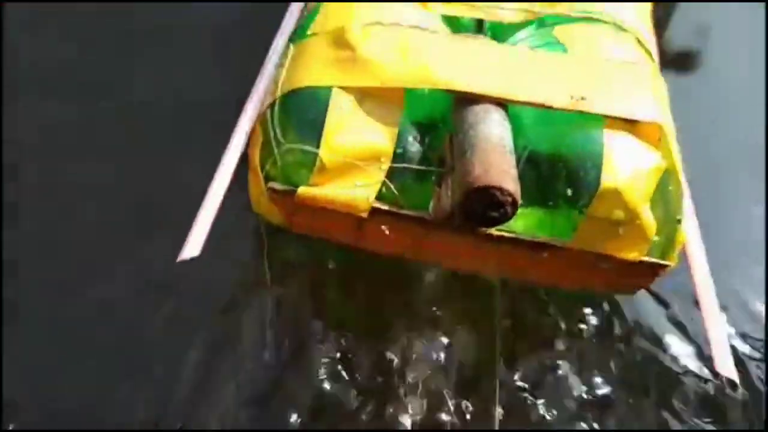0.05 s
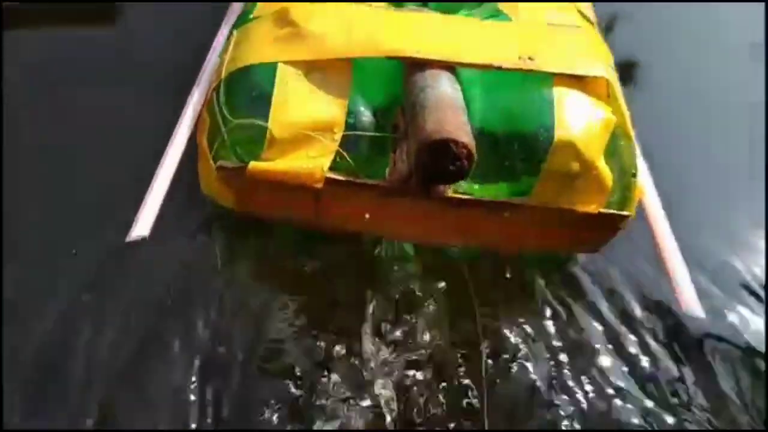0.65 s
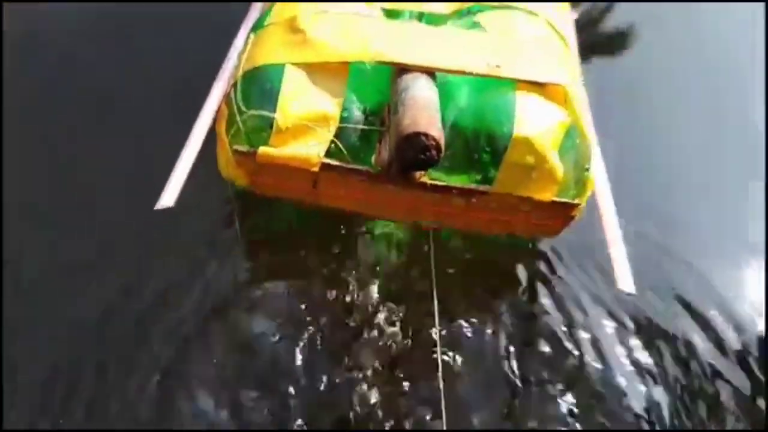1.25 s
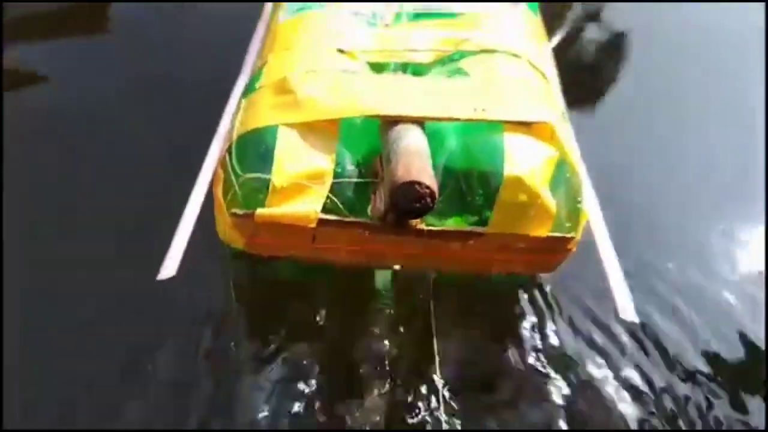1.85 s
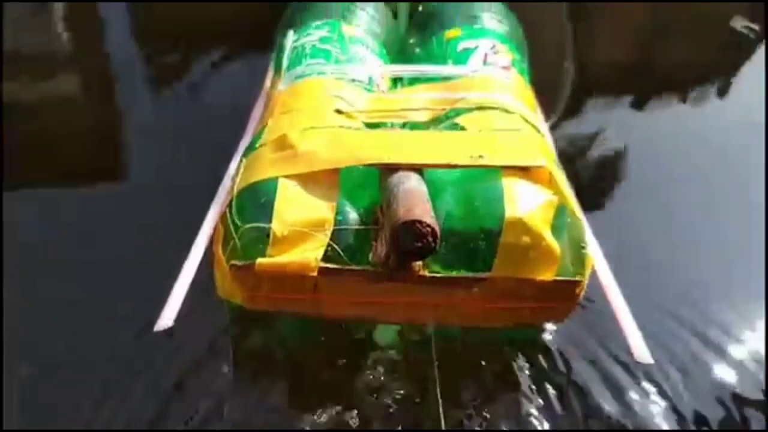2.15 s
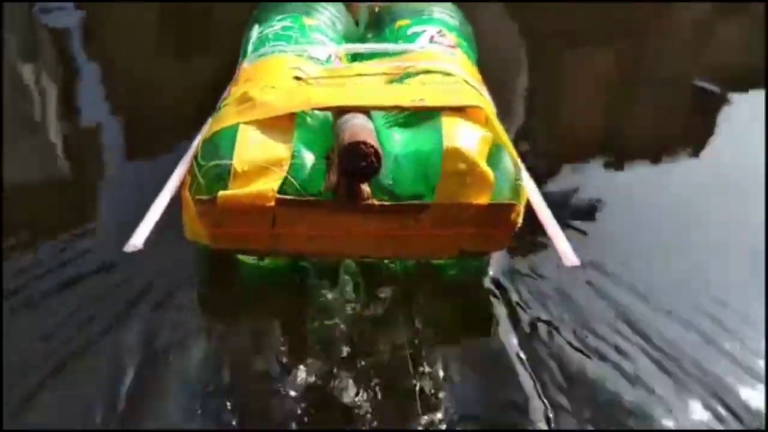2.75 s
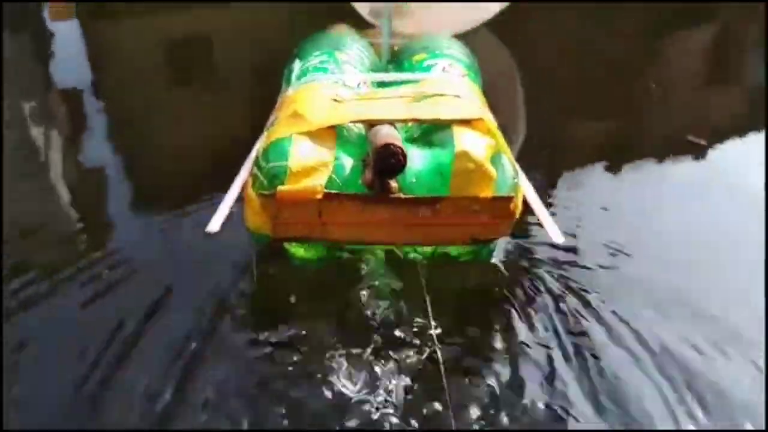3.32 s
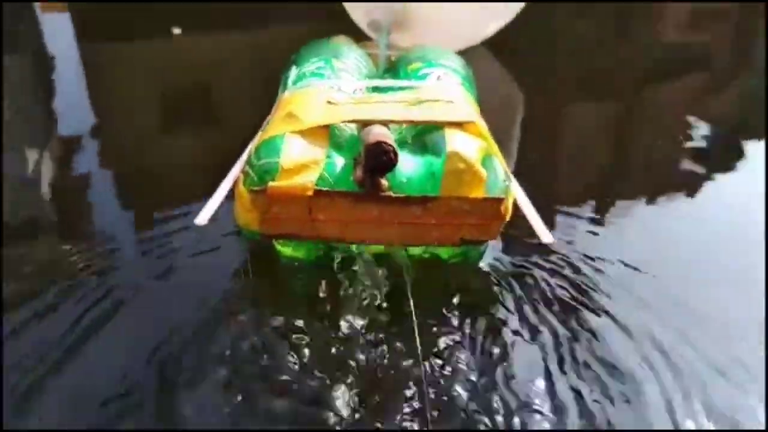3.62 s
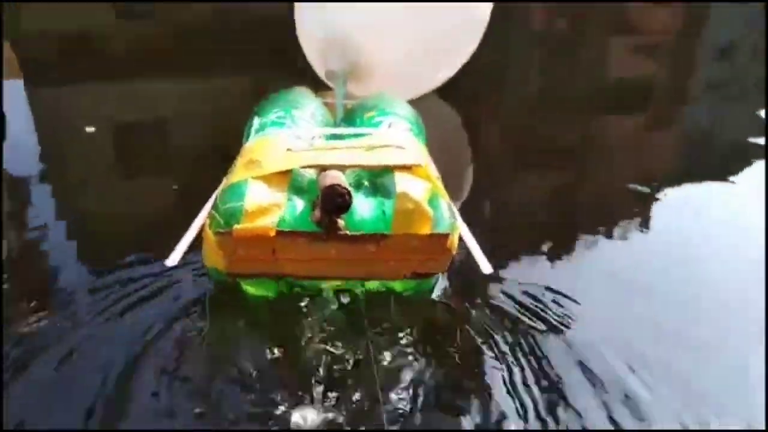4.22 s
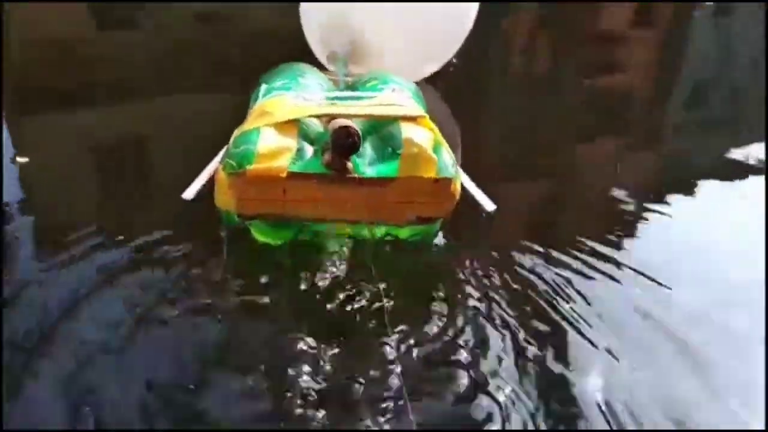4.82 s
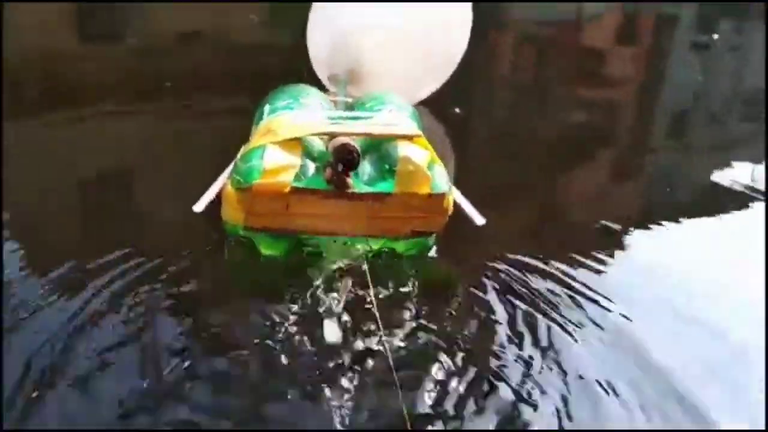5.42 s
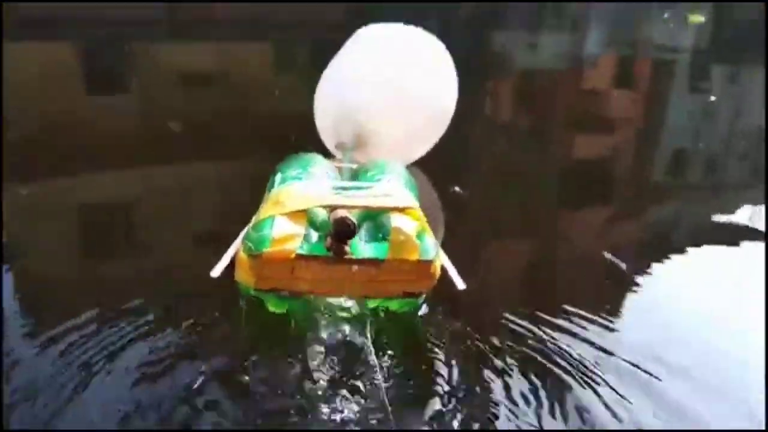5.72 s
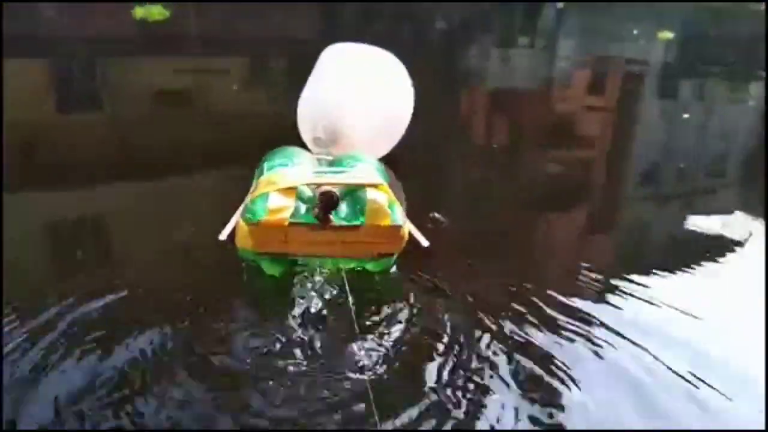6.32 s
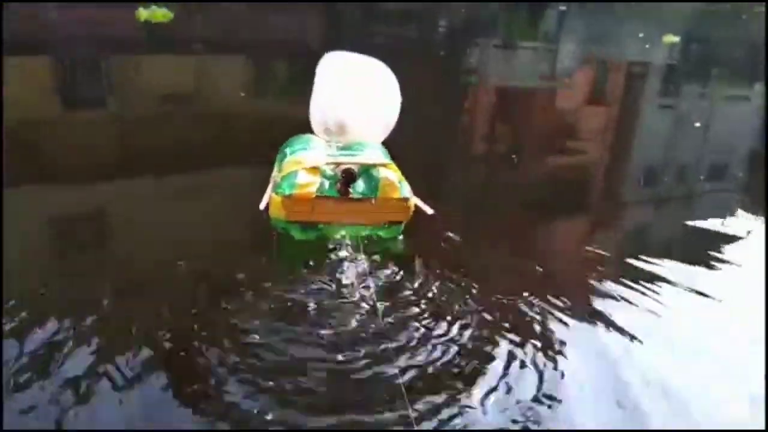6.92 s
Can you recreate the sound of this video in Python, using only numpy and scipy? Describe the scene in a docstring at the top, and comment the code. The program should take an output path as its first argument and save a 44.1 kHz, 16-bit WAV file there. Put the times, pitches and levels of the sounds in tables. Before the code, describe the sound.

A balloon blows air through a straw under a toy boat, and bubbles burst at the pond's surface in short, ringing pops, about nine a second and uneven in rhythm and loudness. Some carry a low glug or a sharp snap. Between them the wake softly gurgles, splashes and fizzes. The sputtering lasts throughout, heard by a close stereo microphone over very faint open air.

```python
"""Air pockets pop behind a toy boat, driven across a pond by a balloon blowing through a straw under its stern.
About nine times a second one bursts at the surface with a short ringing pop; a low glug follows some.
Between the pops the wake gurgles, chirps, splashes and fizzes, over faint echoes and a bed of open air.
A close stereo microphone follows the boat."""
import sys
import numpy as np
from scipy import signal
from scipy.fft import rfft, irfft, next_fast_len
from scipy.io import wavfile
from scipy.ndimage import uniform_filter1d, map_coordinates

SR = 44100
rng = np.random.default_rng(int(sys.argv[2]) if len(sys.argv) > 2 else 0)


def wav_record(signal):
    """Record a signal, one row per channel, as 16-bit PCM in the file named by sys.argv[1]."""
    frames = np.transpose(np.atleast_2d(signal))
    bounded = np.clip(frames, -1, 1)
    # unit amplitude maps onto the largest positive 16-bit level
    quanta = np.round(bounded * 32767).astype(np.int16)
    wavfile.write(sys.argv[1], SR, quanta)


N = 307244
TIME = np.arange(N) / SR
FFT_SIZE = next_fast_len(N, True)
FFT_HZ = np.fft.rfftfreq(FFT_SIZE, 1 / SR)

# bursting pockets: t/s, ring length/s, base level/dB, focus f/Hz, roll-off/(dB/octave), main ring f/Hz
POCKET_BURSTS = [(0.0696, 0.01, -28, 2200, 14, 1457), (0.159, 0.004, -18, 2700, 7.5, 1290),
                 (0.2777, 0.0027, -11.5, 1760, 15, 1305), (0.3796, 0.0089, -17, 1440, 21.5, 1522),
                 (0.4483, 0.0015, -25.5, 1410, 23.5, 1530), (0.485, 0.0029, -12, 2040, 14.5, 1412),
                 (0.562, 0.0044, -9, 2410, 22.5, 1382), (0.66, 0.0024, -21.5, 3080, 8.5, 1420),
                 (0.727, 0.0049, -47.5, 900, 14, 1490), (0.7606, 0.0012, -7, 1740, 22.5, 1477),
                 (0.8737, 0.0059, -12, 1750, 18, 1342), (0.9893, 0.0023, -10.5, 2140, 19.5, 1380),
                 (1.0787, 0.0022, -12.5, 2290, 17.5, 1415), (1.253, 0.0042, -19, 1940, 19, 1455),
                 (1.422, 0.0046, -15, 2290, 15.5, 1384), (1.4745, 0.0046, -27, 3350, 7.5, 1440),
                 (1.557, 0.0049, -19, 2250, 13.5, 1386), (1.7194, 0.003, -9, 1960, 19.5, 1414),
                 (1.7644, 0.0041, -12, 1670, 28.5, 1387), (1.9192, 0.0037, -16, 1750, 19.5, 1355),
                 (2.04, 0.0025, -9, 2030, 19, 1379), (2.131, 0.006, -41, 1920, 10.5, 1430),
                 (2.1862, 0.0036, -26.5, 1440, 22.5, 1630), (2.2225, 0.0026, -10, 2370, 15.5, 1430),
                 (2.4593, 0.0046, -20, 2560, 11, 1500), (2.568, 0.0026, -31.5, 1460, 21, 1470),
                 (2.624, 0.007, -20, 3030, 9.5, 1410), (2.692, 0.0021, -12, 1430, 24, 1434),
                 (2.727, 0.0038, -17.5, 2150, 22, 1400), (2.745, 0.0077, -36.5, 750, 0, 1400),
                 (2.785, 0.0023, -12, 2180, 18, 1512), (2.926, 0.0037, -36, 904, 27, 1690),
                 (3.0093, 0.0061, -24, 1780, 18, 1360), (3.0897, 0.0065, -39.5, 1710, 6.5, 1140),
                 (3.206, 0.0063, -26, 1900, 16, 1340), (3.339, 0.0048, -19, 2140, 17, 1316),
                 (3.407, 0.002, -24.5, 2000, 11, 1394), (3.4758, 0.0038, -12, 2020, 23, 1384),
                 (3.694, 0.0051, -40.5, 1480, 12, 1410), (3.7355, 0.003, -22.5, 2650, 11, 1430),
                 (3.826, 0.0031, -24.5, 3340, 9.5, 1306), (3.9685, 0.0044, -13.5, 1490, 19, 1390),
                 (4.0696, 0.0012, -9.5, 2240, 16.5, 1478), (4.214, 0.0015, -13, 3000, 12, 1360),
                 (4.333, 0.0044, -27.5, 2700, 9.5, 1486), (4.446, 0.0014, -12, 2270, 17.5, 1430),
                 (4.555, 0.0037, -18.5, 2600, 10.5, 1490), (4.6875, 0.0054, -19.5, 3050, 9, 1251),
                 (4.79, 0.0029, -14.5, 2570, 12, 1430), (4.8631, 0.0044, -17, 2480, 11.5, 1482),
                 (5.158, 0.0018, -17.5, 2960, 11, 1420), (5.26, 0.0048, -43, 1560, 4.5, 1500),
                 (5.321, 0.0033, -16, 2060, 18, 1458), (5.404, 0.0017, -13, 2480, 18, 1418),
                 (5.523, 0.0037, -24.0, 2510, 12, 1384), (5.714, 0.0082, -34.5, 1880, 13.5, 1436),
                 (5.7582, 0.0016, -16.5, 2900, 11.5, 1493), (6.0605, 0.0084, -19.5, 1435, 25, 1430),
                 (6.2182, 0.0031, -22.5, 2050, 10, 1455), (6.38, 0.0042, -25.5, 1810, 12, 1447),
                 (6.493, 0.0056, -25.5, 2410, 8.5, 1380), (6.7253, 0.0032, -7.5, 1626, 26, 1430),
                 (6.8139, 0.0036, -15.5, 2970, 13.5, 1506), (6.868, 0.0048, -26, 2820, 9.5, 1495),
                 (6.9223, 0.0013, -19.5, 1760, 16, 1450)]
# modes of an opening pocket: nominal f/Hz, gain/dB, ring length factor, roughness, pitch scatter, polarity
POCKET_MODES = [(710, 12, 0.96, 0.5, 0.059, 1), (1430, 0.5, 1.19, 0.52, 0.015, -0.92),
                (2142, 0, 1.53, 0.69, 0.035, 0.81), (3018, -4, 0.41, 0.96, 0.064, -0.82),
                (3908, -0.5, 2, 1, 0.087, 0.58)]
# sharp cracks among the pops: t/s, level/dB
CRACK_HITS = [(0.161, -31.5), (1.08, -35), (2.041, -36), (2.787, -27.5), (4.071, -37.5), (4.215, -48),
              (5.1593, -34.5), (5.404, -44), (5.76, -32), (6.137, -36.5)]
# lone bubbles ringing under water: t/s, f/Hz, level/dB, decay/s
GLUG_NOTES = [(.163, 604, -24, 0.0067), (.283, 636, -30, 0.013), (0.676, 539, -25.5, 0.0038),
              (1.081, 481, -20.5, 0.0053), (1.933, 980, -28, 0.004), (2.043, 528, -17, 0.0031),
              (2.466, 541, -15, 0.003), (2.742, 429, -11.5, 0.0035), (3.836, 506, -28, 0.0028),
              (4.336, 478, -25, 0.009), (4.559, 444, -23.5, 0.01)]
# small rising bubbles: centre t/s, centre f/Hz, level/dB
CHIRP_NOTES = [(0.324, 1200, -38.5), (0.806, 1290, -39.5), (1.608, 1200, -42.5), (2.834, 1280, -43.5),
               (3.071, 1165, -39), (3.386, 1420, -39), (3.777, 1700, -37), (5.8, 1220, -45),
               (6.76, 1710, -31)]
# splashes behind the stern: centre t/s, length/s, bubble level/dB, spray level/dB
SPLASH_SWELLS = [(0.013, 0.077, -39, -60), (0.147, 0.063, -39.5, -38.5), (0.261, 0.061, -74, -44),
                 (0.36, 0.078, -43.5, -45), (0.526, 0.13, -32, -44), (0.652, 0.07, -40.5, -46.5),
                 (0.854, 0.081, -45, -44), (1.047, 0.017, -37, -49), (1.29, 0.041, -39.5, -50),
                 (1.463, 0.15, -39.5, -51.5), (1.758, 0.095, -34, -53), (2.023, 0.057, -77, -40.5),
                 (2.278, 0.053, -35, -52.5), (2.454, 0.043, -45.5, -44.5), (2.637, 0.1, -41, -47),
                 (2.746, 0.072, -27, -45), (3.084, 0.06, -43.5, -52), (3.412, 0.095, -44.5, -77),
                 (3.992, 0.074, -38.5, -52), (4.107, 0.041, -36, -48), (4.506, 0.041, -40, -56),
                 (4.866, 0.11, -46, -45), (5.122, 0.079, -45.5, -49.5), (6.291, 0.032, -41.5, -39.5),
                 (6.391, 0.042, -40.5, -54), (6.6, 0.052, -77, -42), (6.671, 0.029, -54, -37),
                 (6.773, 0.064, -33, -41.5), (6.876, 0.087, -39.5, -43.5)]
# fader rides of the steady gurgle, the steady fizz and the low rumble: t/s, relative level/dB
GURGLE_RIDE = [(0.0, -51), (0.5, -49.5), (1.2, -56), (1.5, -55), (2.6, -50.5), (3.1, -61.5), (4.0, -50.5),
               (4.7, -51.5), (5.9, -56), (6.97, -51)]
FIZZ_RIDE = [(0.0, -48), (0.2, -62.5), (0.72, -55.5), (1.24, -58), (2.23, -51.5), (2.39, -62), (4.05, -50),
             (4.5, -57), (4.87, -48.5), (5.18, -58), (6.09, -56.5), (6.75, -46.5), (6.97, -53)]
RUMBLE_RIDE = [(0.3, -62), (1.3, -74), (2.71, -60.5), (3.2, -74.5), (4.6, -64), (6.46, -62)]
# shelf on the spray above 9 kHz: t/s, gain/dB
SPARKLE_RIDE = [(0, 14.5), (2.2, 10), (3.2, 0.5), (4, -3.5), (5.6, 1.5), (6.2, 3.5), (6.97, -15)]
# soft low thumps: t/s, rumble boost/dB
RUMBLE_THUMPS = [(2.778, 23), (6.071, 14.5), (6.23, 13.5)]
# tone of the gurgle, the slosh, the fizz and the open air: f/Hz, relative level/dB
GURGLE_EQ = [(350, -13), (700, 2), (980, -7.5), (1400, 0.5), (1750, -6), (2080, 5.5), (2600, -7.5),
             (3300, 4.5), (3900, -4.5), (4700, -5)]
SLOSH_EQ = [(260, -13), (450, -7), (750, -1.5), (1000, -5.5), (1450, -10), (2050, 12), (2650, 13),
            (3500, 9), (4200, 4.5), (4800, -1.5)]
FIZZ_EQ = [(3500, -2.5), (4750, -9.5), (5200, 8), (6800, 1), (9100, 0), (9900, -7), (11200, -1),
           (15000, -11)]
AIR_EQ = [(25, -11), (80, 1.5), (150, 8.5), (300, 3), (2000, -56), (15000, -46.5)]
# stereo balance: f/Hz, left minus right level/dB
MIC_BALANCE = [(350, -6.5), (750, -7), (1300, 0.5), (1550, 3.5), (1780, 23), (2250, 3.5), (4750, -2),
               (5700, -10), (7000, -3)]
# stereo phase: f/Hz, lead of the left channel/rad
MIC_PHASE = [(340, 1.57), (1700, 0.19), (1900, 4), (2500, 3.5), (3050, 4.5), (3350, 1), (4300, 0.7),
             (5350, 4.5), (5600, -9.5), (6800, 0), (15000, -20.5)]


def pops(rough_knee_db=14, snap_hz=6180, snap_db=-11):
    """Each pocket rings five modes tuned by its size and snaps as its film tears; narrow plops ring cleanest."""
    out, t = np.zeros(N), np.arange(SR // 20) / SR
    treble = signal.butter(2, 4400, "high", fs=SR, output="sos")
    for start_s, length_s, level_db, focus_hz, rolloff_db, main_hz in POCKET_BURSTS:
        tuning = main_hz / POCKET_MODES[1][0]
        torn = 2 * rough_knee_db / (rolloff_db + rough_knee_db)
        for hz, mode_db, length_factor, rough, scatter, polarity in POCKET_MODES:
            pitch = hz * tuning * np.exp(scatter * rng.standard_normal())
            ring = cavity_mode(t, pitch, length_s * length_factor, rough * torn)
            loss_db = rolloff_db * abs(np.log2(hz / focus_hz))
            add(out, start_s, polarity * at_level(ring, level_db + mode_db - loss_db))
        tear = signal.sosfilt(treble, rng.standard_normal(len(t)) * np.exp(-t / length_s))
        snap = signal.lfilter([1], [1, -1.1, .36], tear)
        loss_db = rolloff_db * abs(np.log2(snap_hz / focus_hz))
        add(out, start_s, at_level(snap, level_db + snap_db - loss_db))
    # the pops carry almost no bass
    return signal.sosfilt(signal.butter(3, 450, "high", fs=SR, output="sos"), out)


def cavity_mode(t, hz, length_s, rough, tail_db=-26, tail_s=0.0083, glide=0.025, flutter_hz=900):
    """One mode of an opening pocket swells in a cycle or two, holds and collapses, gliding up a little."""
    attack = (1 - np.exp(-t * hz)) ** 2
    decay = np.exp(-(t / length_s) ** 1.244) + from_db(tail_db) * np.exp(-t / tail_s)
    phase = phase_of(hz * (1 + glide * np.tanh(t / length_s - .5)))
    # the tearing water film shakes the ring
    shake = drift(flutter_hz, len(t)) + 1j * drift(flutter_hz, len(t))
    return attack * decay * np.imag((1 + rough * shake) * np.exp(1j * phase))


def cracks(decay_s=0.0014):
    """Very short broadband snaps put a hard edge among the pops."""
    out, t = np.zeros(N), np.arange(SR // 100) / SR
    for start_s, level_db in CRACK_HITS:
        burst = rng.standard_normal(len(t)) * np.exp(-t / decay_s)
        bright = signal.lfilter([1, -1], [1, -1.15, .55], burst)
        add(out, start_s, at_level(bright, level_db))
    return out


def glugs(sag=0.126, sag_s=0.0091, climb_s=0.069, tail_db=-19, tail_s=0.02):
    """A lone bubble sinks in pitch as it swells, then rings on faintly, climbing as it nears the surface."""
    out, t = np.zeros(N), np.arange(SR // 10) / SR
    for start_s, hz, level_db, decay_s in GLUG_NOTES:
        pitch = hz * (1 + sag * (2 * np.exp(-t / sag_s) - 1) + (t / climb_s) ** 2)
        attack = 1 - np.exp(-t * hz)
        decay = np.exp(-t / decay_s) + from_db(tail_db) * np.exp(-t / tail_s)
        add(out, start_s, from_db(level_db) * attack * decay * np.sin(phase_of(pitch)))
    return out


def chirps(width_s=0.012, octaves_per_s=22, flutter_hz=300):
    """A small bubble nears the surface: its note swells and fades unevenly while it climbs."""
    out, t = np.zeros(N), np.arange(-SR // 20, SR // 20) / SR
    for centre_s, hz, level_db in CHIRP_NOTES:
        phase = phase_of(hz * 2 ** (octaves_per_s * t)) + drift(flutter_hz, len(t))
        envelope = np.exp(-(t / width_s) ** 2) * (1 + drift(flutter_hz, len(t)))
        add(out, centre_s + t[0], from_db(level_db) * envelope * np.sin(phase))
    return out


def splash_envelopes(flutter_db=3, flutter_hz=110):
    """Each splash swells and dies away unevenly: one gain curve for its bubbles, one for its spray."""
    gains = sum(np.outer(from_db(levels_db), swell(centre_s, length_s / 2, steepness=3.94))
                for centre_s, length_s, *levels_db in SPLASH_SWELLS)
    return gains * from_db(flutter_db * drift(flutter_hz))


def wake(splash_gain, gurgle_db=1, drops_db=-3):
    """Small bubbles gurgle in clusters; splashes add a denser slosh and ringing drops."""
    steady_gain = from_db(gurgle_db) * fluttering(GURGLE_RIDE, flutter_db=9.5, flutter_hz=40)
    swarm = bubble_swarm(GURGLE_EQ, per_s=2400, cycles=78, spread_db=3.5, leveller_s=0.029)
    gurgle = clustered(swarm, low_hz=684, high_hz=3640, depth_db=6.5, flutter_hz=45)
    slosh = bubble_swarm(SLOSH_EQ, per_s=4000, cycles=77, spread_db=1.5, leveller_s=0.008)
    drops = droplets(low_hz=1367, high_hz=2450, cycles=11, climb=0.035,
                     spread_db=5, rise_s=0.00063, count=1500)
    return steady_gain * gurgle + splash_gain * (slosh + from_db(drops_db) * drops)


def bubble_swarm(eq, per_s, cycles, spread_db, leveller_s, pitches=36):
    """Small bubbles each ring at their own pitch, dying by 60 dB over `cycles`; the sum is levelled."""
    births, pitch_index, out = clicks(per_s, spread_db), rng.integers(0, pitches, N), np.zeros(N)
    low_hz, high_hz = eq[0][0], eq[-1][0]
    for k, hz in enumerate(np.geomspace(low_hz, high_hz, pitches)):
        radius, angle = from_db(-60 * hz / (cycles * SR)), 2 * np.pi * hz / SR
        kicks = births * (pitch_index == k) + 1e-18
        out += hz * signal.lfilter([0, np.sin(angle)], [1, -2 * radius * np.cos(angle), radius ** 2], kicks)
    out = coloured(out, [(low_hz / 2, -30), *eq, (high_hz * 2, -45)])
    local_power = uniform_filter1d(out ** 2, int(leveller_s * SR))
    return out / np.sqrt(local_power + 0.0081)


def droplets(low_hz, high_hz, cycles, climb, spread_db, rise_s, count):
    """Separate round bubbles ping at random, each bending upwards as it rings; unit power."""
    out, t = np.zeros(N), np.arange(int(6 * cycles / low_hz * SR)) / SR
    for when, height, strength in rng.random((count, 3)):
        hz = low_hz * (high_hz / low_hz) ** height
        age = t * hz / cycles
        phase = phase_of(hz * (1 + climb * np.minimum(age, 4)))
        envelope = (1 - np.exp(-t / rise_s)) * np.exp(-age)
        add(out, when * N / SR, from_db(spread_db * strength) * envelope * np.sin(phase))
    return unit_power(out)


def spray(splash_gain, steady_db=3.5, splash_db=2, crackle_db=-3, wide_db=-5):
    """Spray falls back in wet spurts: tiny bubbles ping among the ticks of drops, spread across the wake."""
    steady_gain = from_db(steady_db) * fluttering(FIZZ_RIDE, flutter_db=5.5, flutter_hz=50)
    pings = droplets(low_hz=4300, high_hz=15000, cycles=18, climb=0.01,
                     spread_db=18, rise_s=0.0002, count=6000)
    crackle, left, right = [coloured(clicks(per_s=1400, spread_db=0.5), FIZZ_EQ) for _ in range(3)]
    fizz = microphone_pair(coloured(pings, FIZZ_EQ) + from_db(crackle_db) * crackle)
    fizz += from_db(wide_db) * np.array([left, right])
    fizz = clustered(fizz, low_hz=5420, high_hz=13960, depth_db=5, flutter_hz=29)
    sparkle = signal.sosfiltfilt(signal.butter(2, 9000, "high", fs=SR, output="sos"), fizz)
    fizz += sparkle * (from_db(ride_db(SPARKLE_RIDE)) - 1)
    return np.hypot(steady_gain, from_db(splash_db) * splash_gain) * fizz


def clustered(x, low_hz, high_hz, depth_db, flutter_hz, bands=5):
    """Bubbles and drops of one size come in clusters: each band swells and fades by itself; unit power."""
    spectrum, centres_hz, out = rfft(x, FFT_SIZE), np.geomspace(low_hz, high_hz, bands), 0
    for weights in np.eye(bands):
        band = irfft(spectrum * np.interp(FFT_HZ, centres_hz, weights), FFT_SIZE)[..., :N]
        out += band * from_db(depth_db * np.tanh(drift(flutter_hz)))
    return unit_power(out)


def bank_echoes(x, level_db=-25, decay_s=0.018):
    """The hull and the banks scatter back a short, weak tail."""
    t = np.arange(SR // 5) / SR
    echoes = rng.standard_normal((2, len(t))) * np.exp(-t / decay_s)
    echoes /= np.sqrt(np.sum(echoes ** 2, axis=1, keepdims=True))
    return from_db(level_db) * signal.fftconvolve(x, echoes, axes=1)[:, :N]


def open_air(level_db=-65, ride_depth=0.99, thump_s=0.021):
    """A faint, wide outdoor bed; its low rumble comes and goes, with a few soft thumps."""
    shared = rng.standard_normal(N)
    air = np.array([coloured(shared * sign + 7.2 * rng.standard_normal(N), AIR_EQ) for sign in (1, -1)])
    rumble = signal.sosfiltfilt(signal.butter(2, 400, fs=SR, output="sos"), air)
    ride = ride_db(RUMBLE_RIDE)
    thumps_db = sum(boost_db * swell(centre_s, thump_s) for centre_s, boost_db in RUMBLE_THUMPS)
    rumble_gain = from_db(ride_depth * (ride - ride.mean()) + thumps_db)
    return from_db(level_db) * (air + rumble * (rumble_gain - 1))


def microphone_pair(x):
    """Two channels share the power, with level and phase differences that depend on frequency."""
    ratio = from_db(across_spectrum(MIC_BALANCE))
    turn = np.exp(.5j * across_spectrum(MIC_PHASE))
    response = np.array([ratio * turn, 1 / turn]) * np.sqrt(2 / (1 + ratio ** 2))
    return irfft(rfft(x, FFT_SIZE) * response, FFT_SIZE)[:, :N]


def from_db(db):
    """Decibels to gain."""
    return 10 ** (np.asarray(db) / 20)


def unit_power(x):
    """Normalise to an RMS of one."""
    return x / np.sqrt(np.mean(x ** 2) + 1e-20)


def at_level(hit, level_db):
    """Scale a hit so that its energy, spread over 10 ms, has this level."""
    return hit * from_db(level_db) * np.sqrt(.01 * SR / np.sum(hit ** 2))


def phase_of(hz):
    """Running phase of a gliding pitch."""
    return 2 * np.pi * np.cumsum(hz) / SR


def across_spectrum(points):
    """Draw a curve through the points on a log-frequency axis."""
    hz, values = np.transpose(points)
    return np.interp(np.log(FFT_HZ + 1), np.log(hz), values)


def coloured(x, eq):
    """Apply an EQ curve; unit power."""
    return unit_power(irfft(rfft(x, FFT_SIZE) * from_db(across_spectrum(eq)), FFT_SIZE)[:N])


def drift(rate_hz, size=N):
    """Smooth random wander with a spread near 1 and `rate_hz` new values a second."""
    steps = np.arange(size) * rate_hz / SR
    knots = rng.standard_normal(size // 10)
    return map_coordinates(knots[:int(steps[-1]) + 2], [steps], order=2, mode="nearest")


def ride_db(ride):
    """A fader ride, sample by sample."""
    return np.interp(TIME, *np.transpose(ride))


def fluttering(ride, flutter_db, flutter_hz):
    """Gain that follows a ride and flutters within `flutter_db` of it."""
    return from_db(ride_db(ride) + flutter_db * np.tanh(drift(flutter_hz)))


def swell(centre_s, width_s, steepness=2):
    """A smooth bump of height 1 in time."""
    shape = np.zeros(N)
    span = slice(max(int((centre_s - 4 * width_s) * SR), 0), int((centre_s + 4 * width_s) * SR))
    shape[span] = np.exp(-np.abs((TIME[span] - centre_s) / width_s) ** steepness)
    return shape


def clicks(per_s, spread_db):
    """Random impulses of uneven size and polarity."""
    sizes = from_db(spread_db * np.minimum(rng.exponential(1, N), 4)) * rng.choice([-1, 1], N)
    return sizes * (rng.random(N) < per_s / SR)


def add(track, start_s, sound):
    """Mix a sound into a track."""
    i = max(int(start_s * SR), 0)
    track[i:i + len(sound)] += sound[:max(N - i, 0)]


def scene():
    """Pops up front, wake and spray around them, echoes and open air behind."""
    slosh_gain, spray_gain = splash_envelopes()
    water = pops() + cracks() + glugs() + chirps() + wake(slosh_gain)
    boat = microphone_pair(water) + spray(spray_gain)
    return boat + bank_echoes(boat) + open_air()


def record(dry):
    """Peaks clip at full scale; a steep low-pass is 60 dB down at 15.6 kHz."""
    return signal.sosfilt(signal.cheby2(16, 60, 15600, fs=SR, output="sos"), np.clip(dry, -1, 1))


dry = scene()
out = record(dry)
wav_record(out)
```